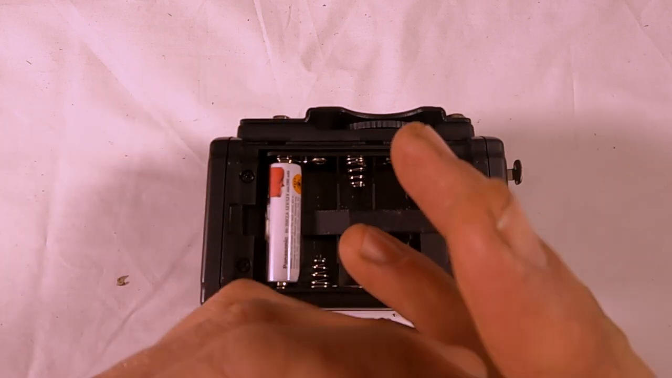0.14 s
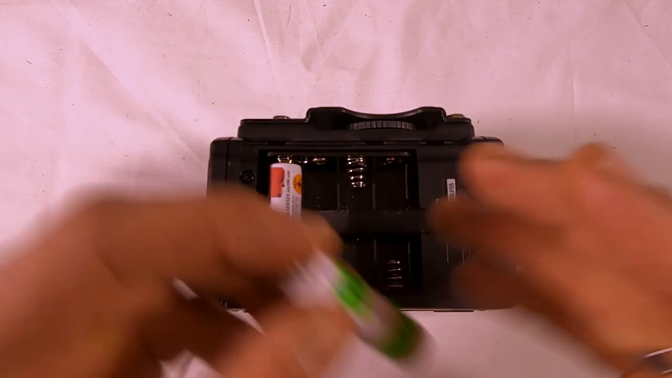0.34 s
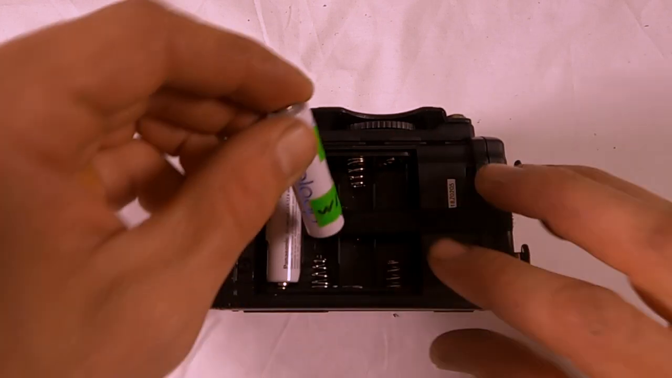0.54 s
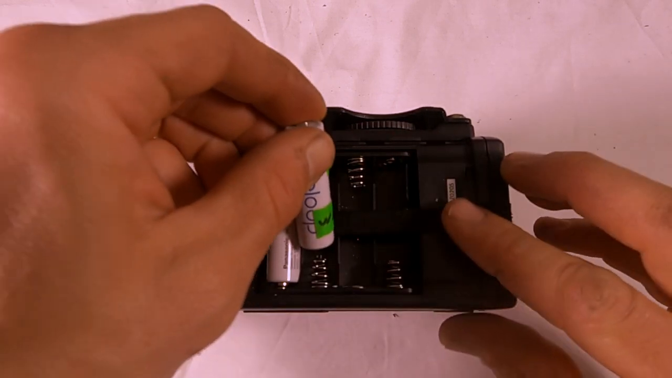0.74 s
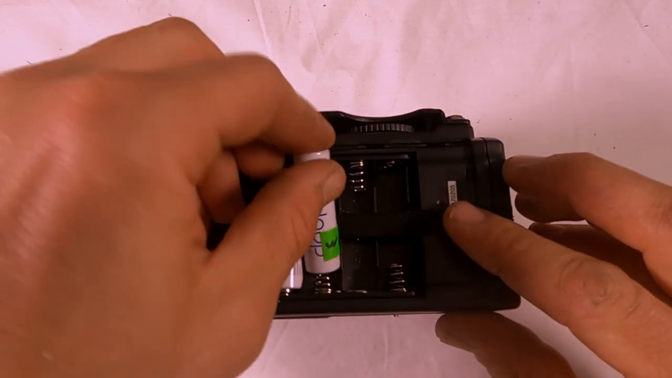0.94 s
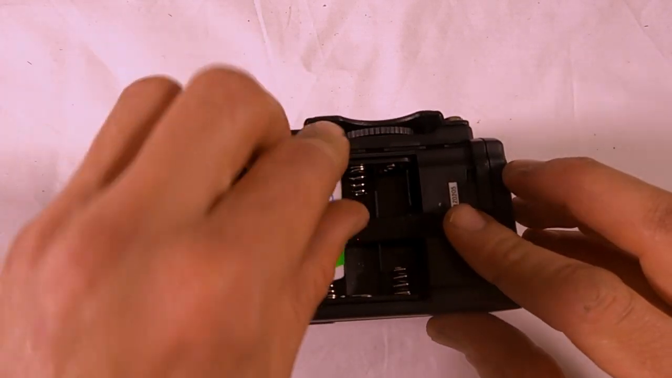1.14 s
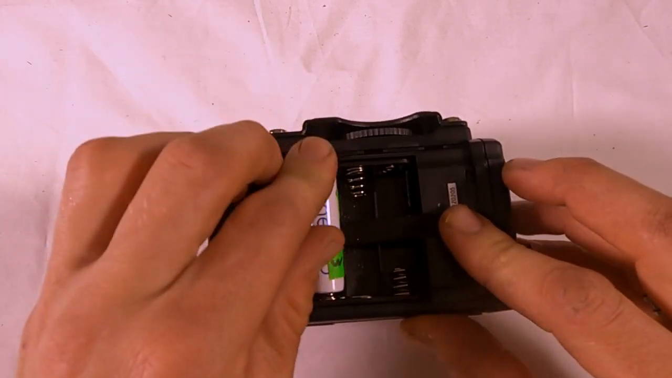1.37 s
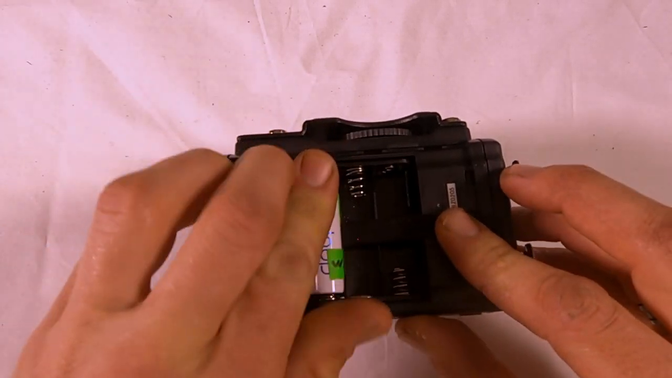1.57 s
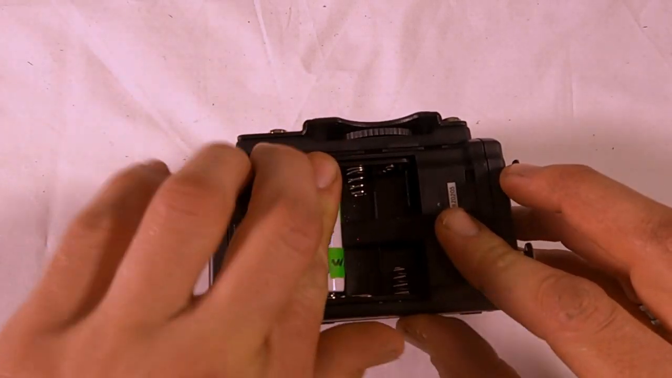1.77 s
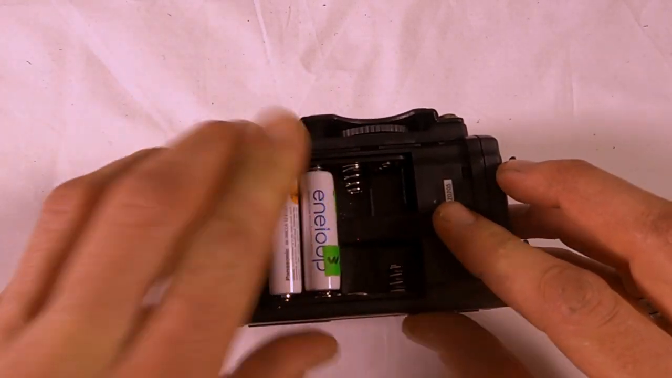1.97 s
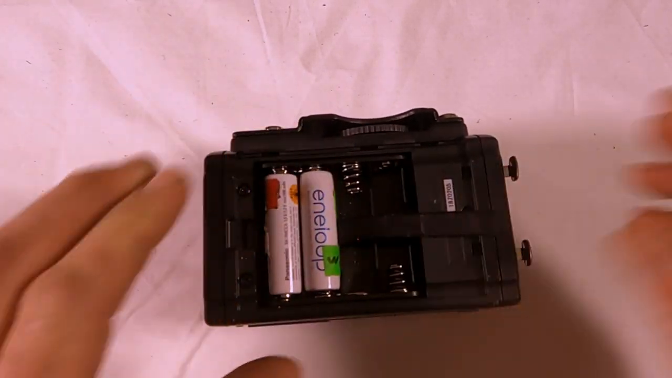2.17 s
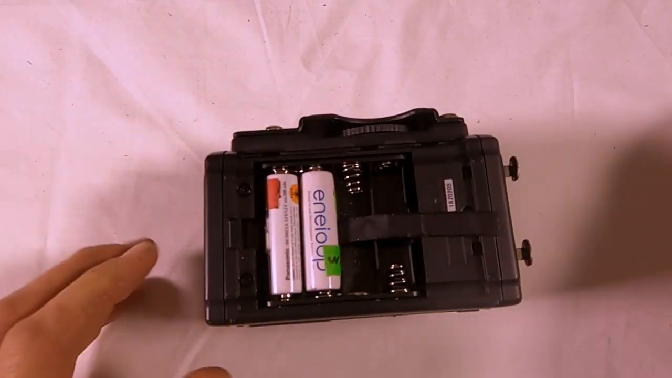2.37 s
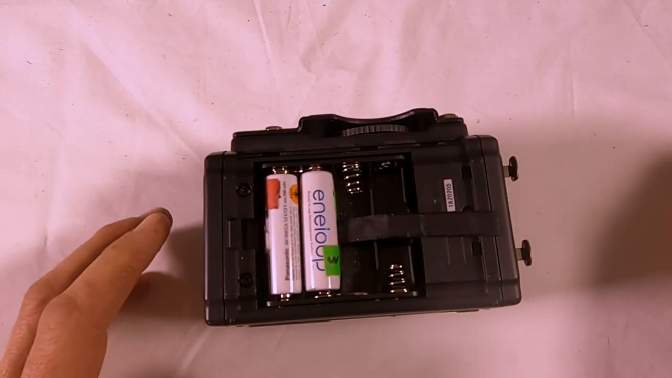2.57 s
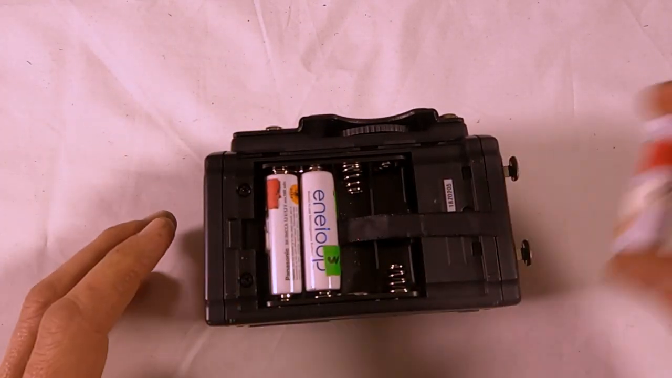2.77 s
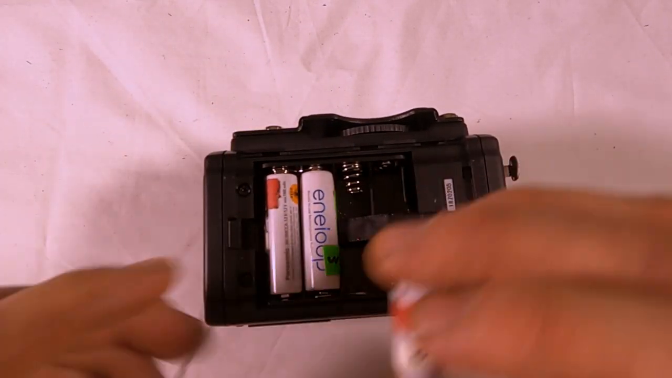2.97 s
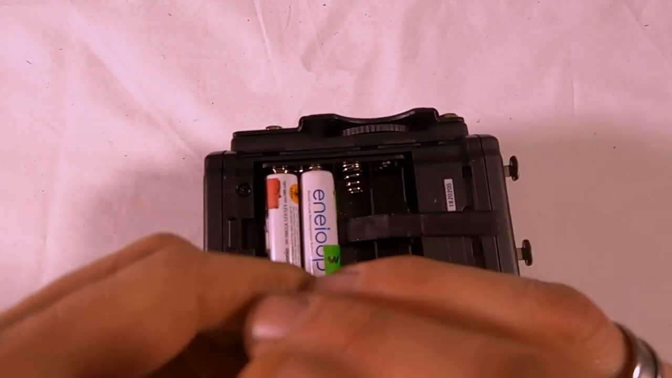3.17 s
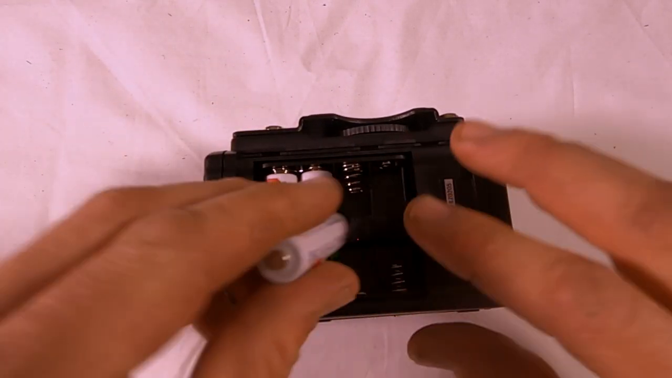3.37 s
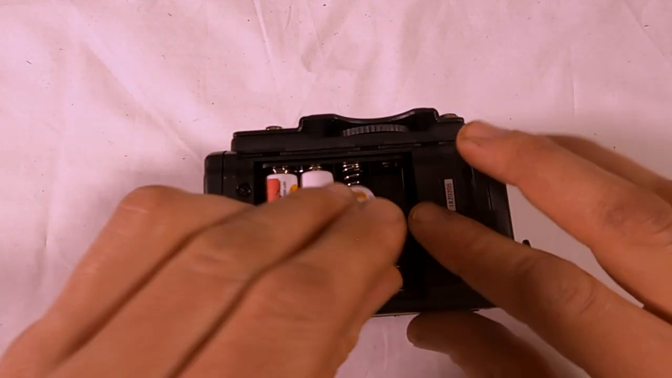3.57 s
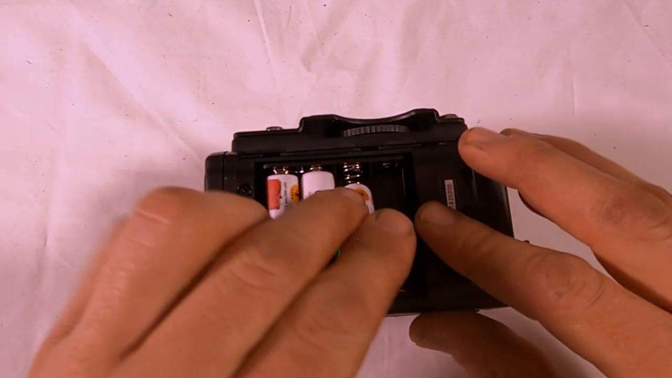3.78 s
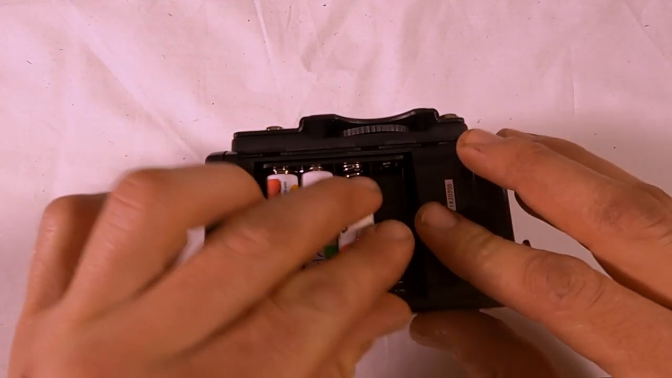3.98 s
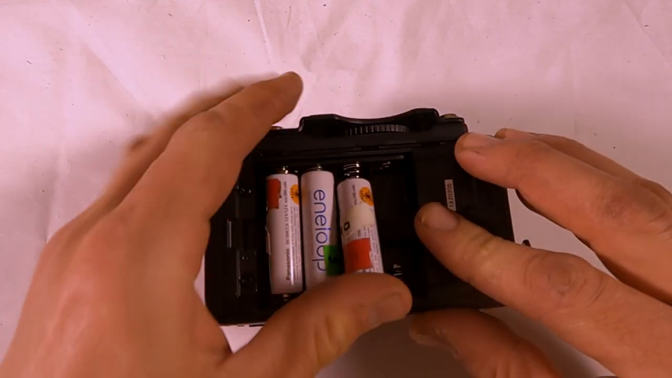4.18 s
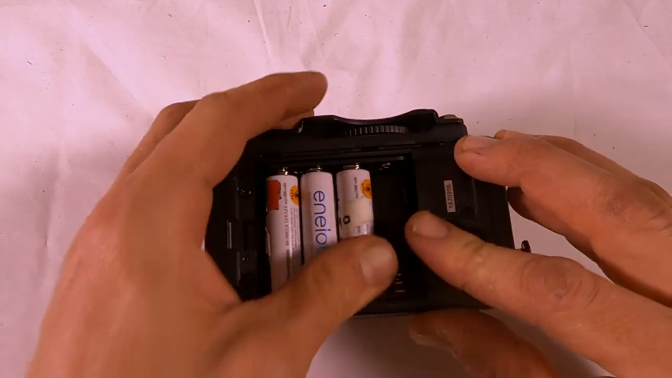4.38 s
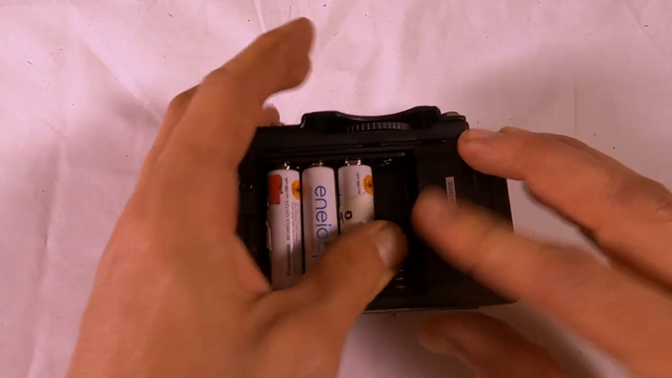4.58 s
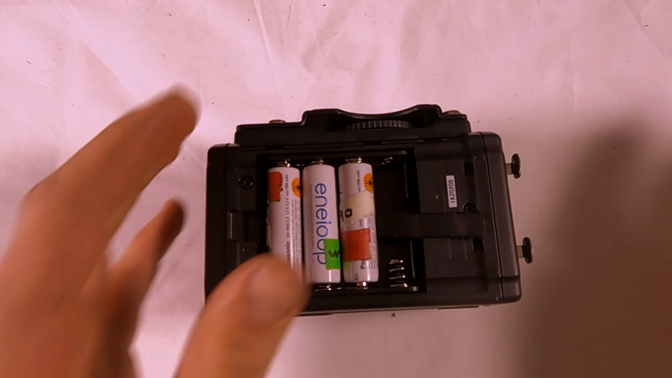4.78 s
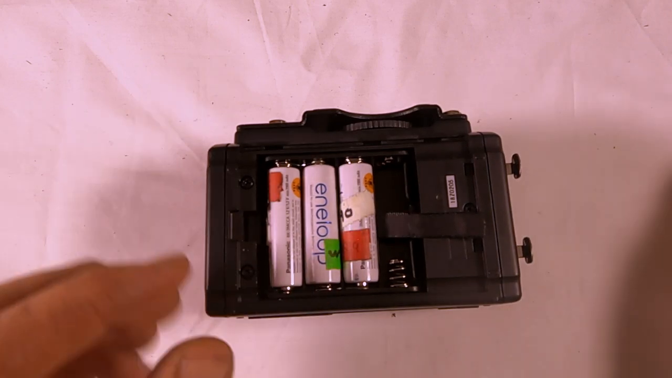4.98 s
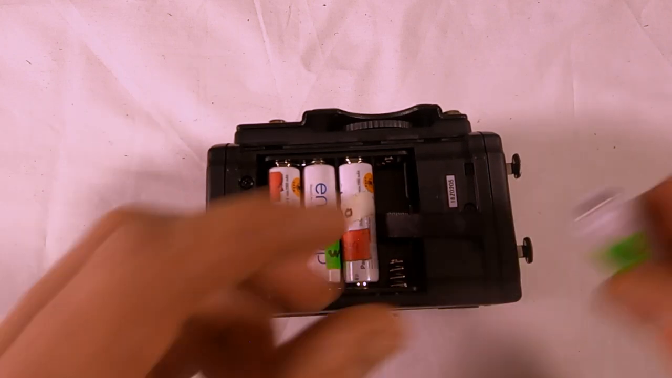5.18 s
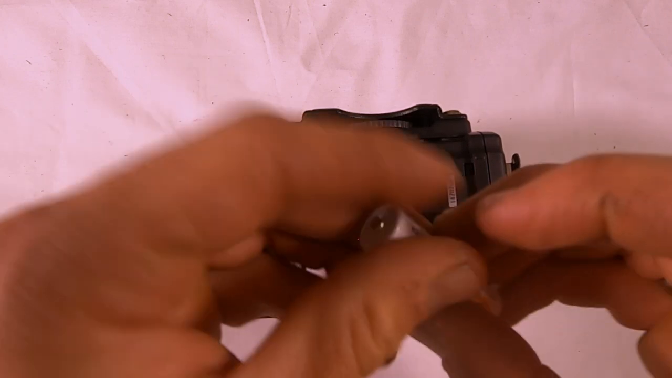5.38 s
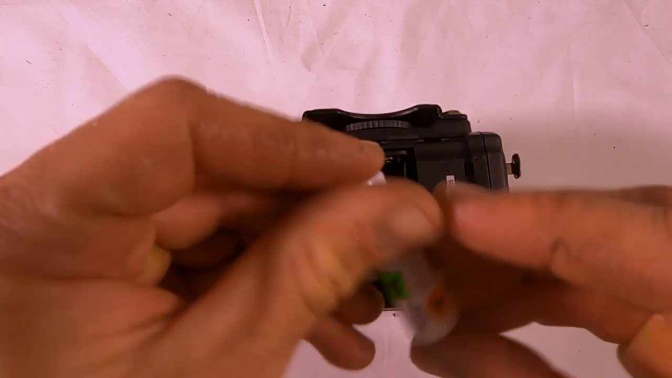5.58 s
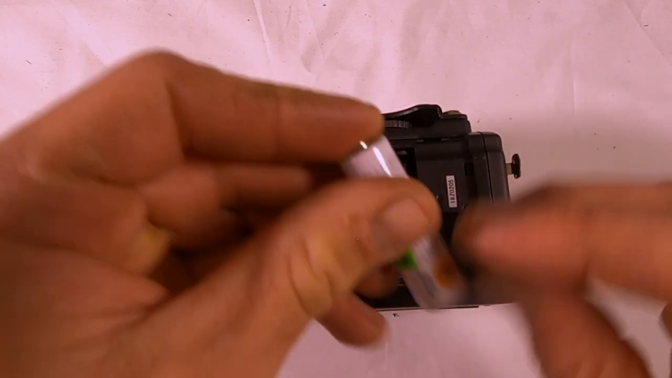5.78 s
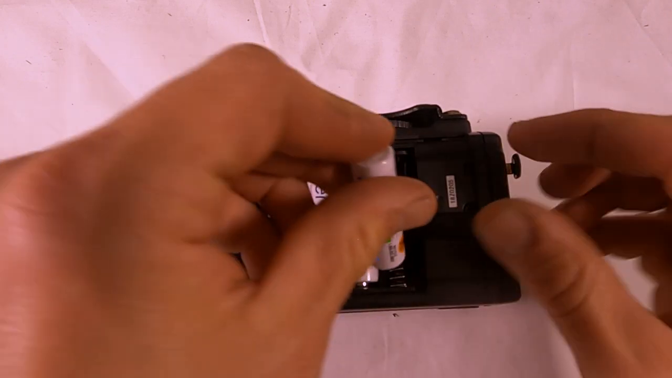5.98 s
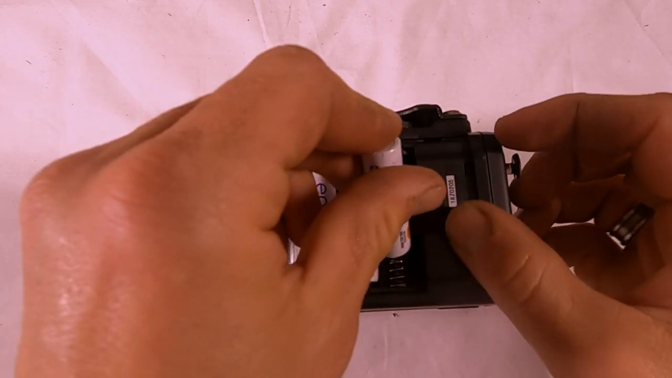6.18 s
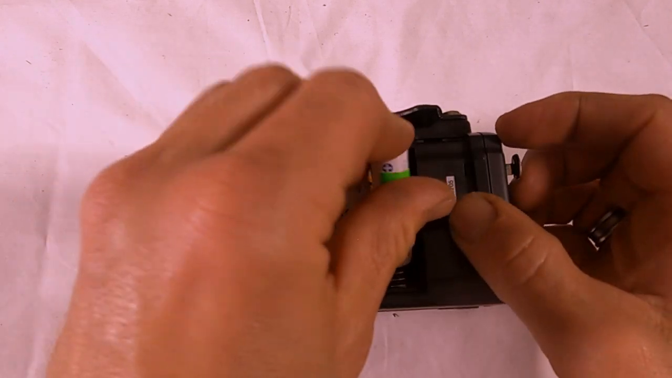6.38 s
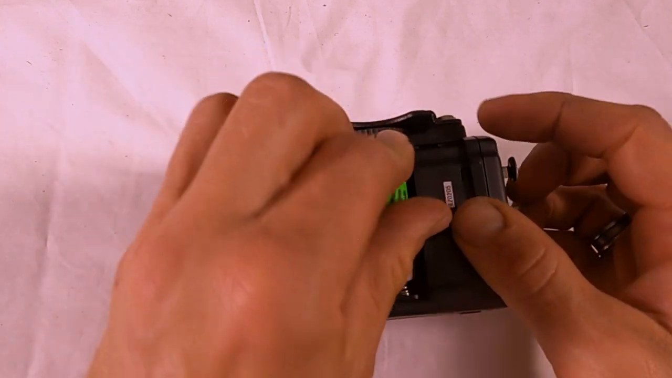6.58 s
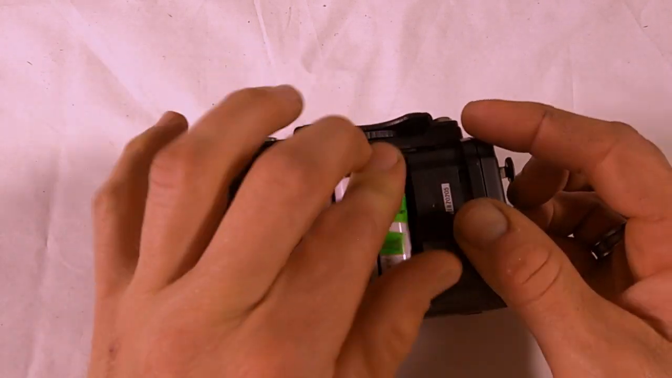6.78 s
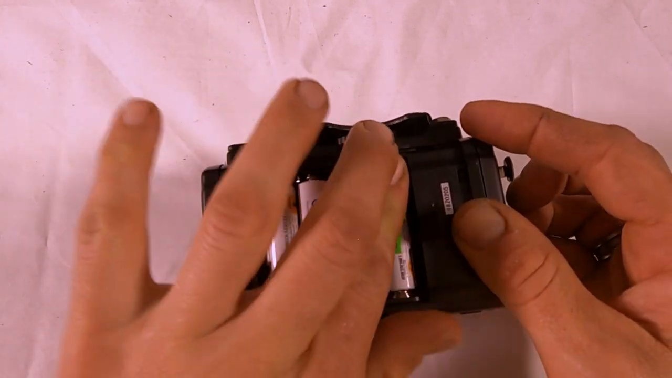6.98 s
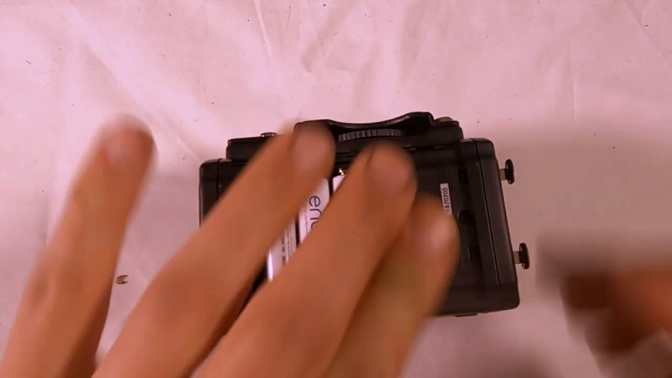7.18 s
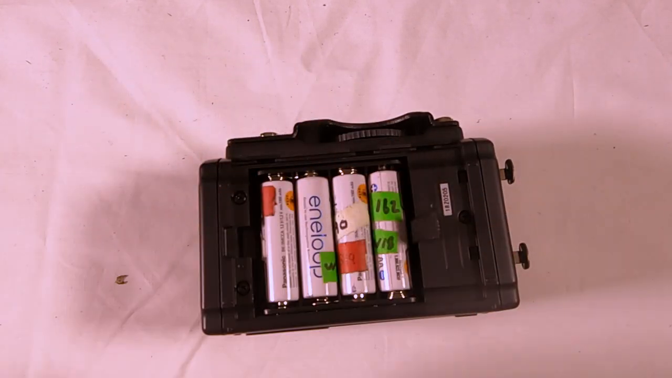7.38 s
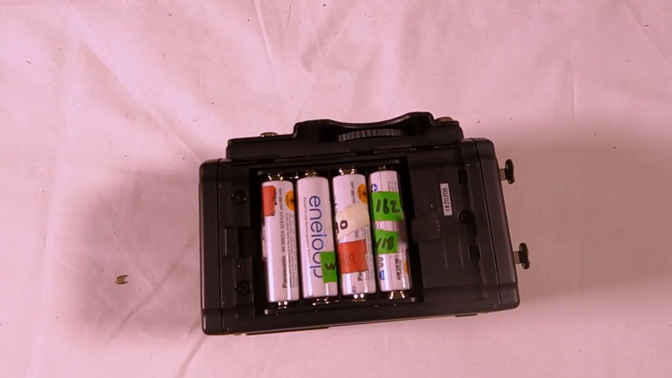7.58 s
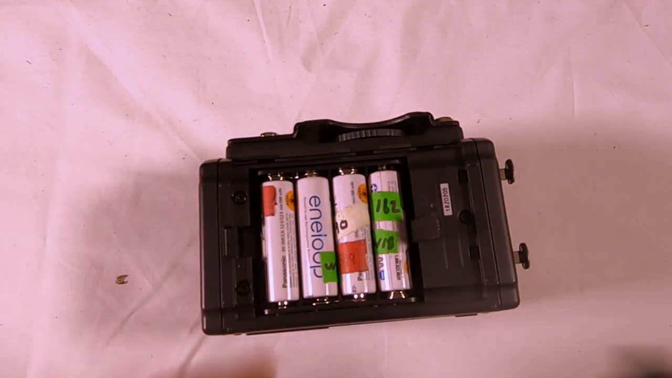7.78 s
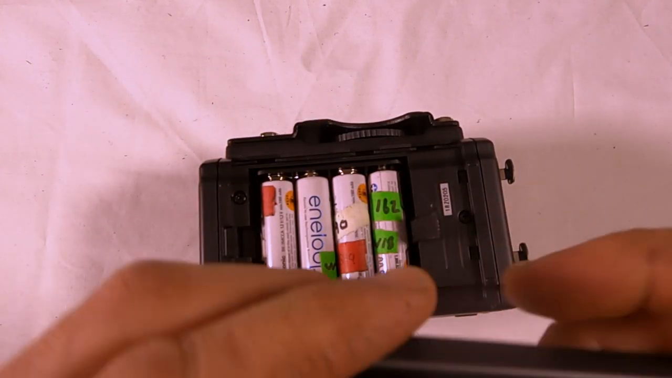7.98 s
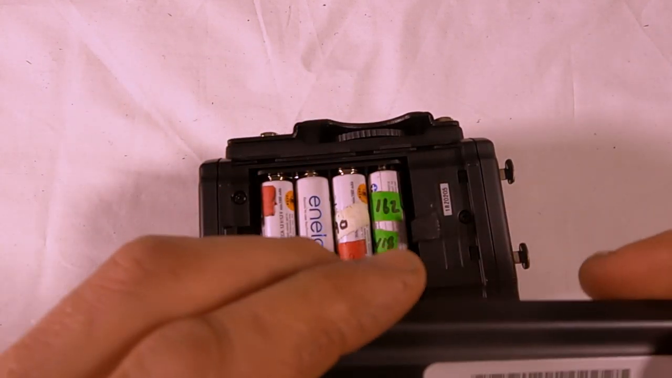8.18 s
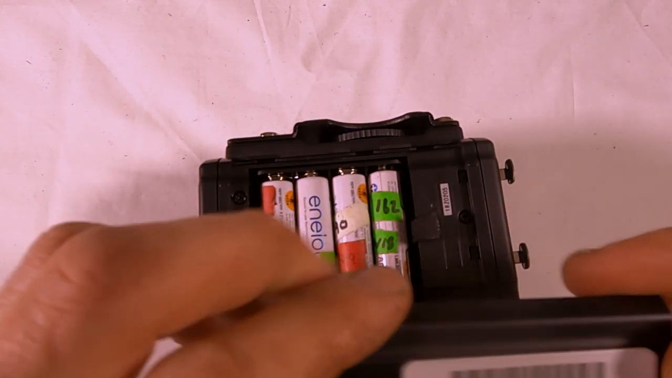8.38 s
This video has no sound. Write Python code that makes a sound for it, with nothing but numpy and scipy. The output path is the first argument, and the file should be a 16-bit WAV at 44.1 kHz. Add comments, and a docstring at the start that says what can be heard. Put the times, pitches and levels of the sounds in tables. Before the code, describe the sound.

Batteries are pushed one after another into the plastic compartment of a small device on a cloth-covered table. They come in three clusters of knocks, scuffs and sharp clicks, with faint twangs from the spring terminals and dull thumps as the case rocks. Fingers rub and squeak softly in between, and a plastic lid clacks lightly near the end. The microphone is close, in a small room with steady hum and ventilation rumble.

```python
"""A small room with mains hum and ventilation rumble; close mono microphone at a cloth-covered table. Batteries
are pressed one by one into the plastic bay of a portable recorder; then its lid slides over the cloth and is
picked up. Cells knock and scuff the case, ringing its modes, and snap onto spring terminals whose coils ring
on. The case thumps on the table; hands rub and squeak by stick-slip."""
import sys
import numpy as np
from scipy import signal
from scipy.fft import rfft, irfft, next_fast_len
from scipy.io import wavfile
from scipy.ndimage import uniform_filter1d

SR = 44100
rng = np.random.default_rng(int(sys.argv[2]) if len(sys.argv) > 2 else 0)


def unload_audio(sound):
    """Save the sound as a 16-bit wav file, at the path given as the first command line argument."""
    columns = np.transpose(np.atleast_2d(sound))
    # keep every value between -1 and 1, then stretch to whole-number steps
    steps = np.round(np.clip(columns, -1, 1) * 32767)
    wavfile.write(sys.argv[1], SR, steps.astype(np.int16))


N = 372115
TAP = 4096  # samples in one ring of the case
TIME_S = np.arange(N) / SR
RING_S, TAP_S = TIME_S[:SR // 4], TIME_S[:TAP]
TAP_HZ = np.linspace(1, SR / 2, TAP // 2 + 1)


def undb(db):
    """Decibels to gain."""
    return 10 ** (np.asarray(db) / 20)


def unit(x):
    """Scale to rms 1."""
    return x / np.sqrt(np.mean(x ** 2))


def fade(t, t60_s):
    """Exponential decay."""
    return np.exp(-np.log(1000) * t / max(t60_s, .001))


def band(x, low_hz, high_hz, order=2):
    """Causal band-pass."""
    sos = signal.butter(order, [low_hz, min(high_hz, SR * .48)], "band", fs=SR, output="sos")
    return signal.sosfilt(sos, x)


def colour(x, points):
    """Shape by (freq_hz, gain_db) points, to rms 1."""
    hz, db = np.transpose(points)
    size = next_fast_len(len(x), True)
    bins_hz = np.linspace(1, SR / 2, size // 2 + 1)
    gain = undb(np.interp(np.log(bins_hz), np.log(hz), db))
    return unit(irfft(rfft(x, size) * gain, size)[:len(x)])


def drift(rate_hz):
    """Smooth random drift, rms 1."""
    size = int(SR / rate_hz)
    steps = np.repeat(rng.standard_normal(N // size + 1), size)
    return unit(uniform_filter1d(steps, size)[:N])


def add(track, start_s, x):
    """Mix x into the track."""
    start = int(start_s * SR)
    track[start:start + len(x)] += x[:len(track) - start]


def background(air_db=-61, waver_db=1.0):
    """Wavering mains hum over ventilation rumble and hiss."""
    # freq_hz, gain_db
    air_spectrum = [(20, -13), (50, -10.5), (85, -4.5), (125, -7), (165, -7.5), (245, -9), (290, -18.5),
                    (420, -19.5), (550, -25.5), (1000, -33.5), (1700, -37), (3000, -41.5), (7000, -44.5),
                    (16000, -47.5)]
    # freq_hz, rms_db
    hum_partials = [(120, -52.5), (240, -66.5)]
    air = colour(rng.standard_normal(N), air_spectrum)
    air *= undb(air_db) / np.std(band(air, 300, 16000, order=6))  # level set above the rumble
    hum = sum(undb(db) * unit(np.sin(2 * np.pi * (hz * TIME_S + rng.random())))
              for hz, db in hum_partials)
    return air + hum * undb(waver_db * drift(1.8))


def rubs(rub_db=-2, hiss_db=-1, ring_db=-4, grain_db=3.0, swell_db=17):
    """Skin, and near 7.5 s the lifted lid, slide over case and cloth in tiny catches; each stroke swells, sinks
    and rings a spot."""
    # peak_s, rise_s, fall_s, level_db, bright_db, ring_hz
    strokes = [(0.42, 0.2, 0.4, -61, -14, 680), (2.258, 0.16, 0.24, -65.5, -6, 1990),
               (2.462, 0.11, 0.15, -55, -15, 510), (4.938, 0.023, 0.11, -50.5, -12, 734),
               (5.25, 0.28, 0.38, -66.5, -14, 1710), (6.285, 0.056, 0.082, -58.5, -18, 1484),
               (7.08, 0.051, 0.15, -51, -16.5, 360), (7.455, 0.034, 0.03, -56, 0.5, 2170),
               (7.586, 0.062, 0.024, -52.5, 9, 1090), (7.81, 0.88, 0.28, -62.5, -4, 1650)]
    # freq_hz, gain_db
    rub_spectrum = [(250, 4), (700, 2), (1700, -5), (3000, -10.5), (5000, -24), (16000, -35)]
    # freq_hz, gain_db
    hiss_spectrum = [(800, -22), (1250, -4), (1800, -1), (2500, 8), (4300, -4.5), (5500, 4), (7000, -4.5),
                     (8600, 4.5), (12500, 5), (14700, -1), (16000, -9)]
    catches = rng.standard_normal((2, N)) * undb(grain_db * drift(350))
    rub, hiss = colour(catches[0], rub_spectrum), colour(catches[1], hiss_spectrum)
    out = np.zeros(N)
    for peak_s, rise_s, fall_s, level_db, bright_db, ring_hz in strokes:
        from_peak = np.maximum((peak_s - TIME_S) / rise_s, (TIME_S - peak_s) / fall_s)
        envelope = undb(level_db - swell_db * np.minimum(from_peak, 10))
        ring = unit(band(catches[1], ring_hz / 1.15, ring_hz * 1.15))
        out += envelope * (undb(rub_db) * rub + undb(ring_db) * ring + undb(bright_db + hiss_db) * hiss)
    return out


def squeaks(waver=0.032, overtone_db=-25):
    """Cell or skin sticks and slips on plastic: short, wavering tones."""
    # start_s, length_s, pitch_hz, rms_db
    slips = [(0.654, 0.052, 895, -61.5), (2.875, 0.081, 465, -53), (3.736, 0.032, 737, -54),
             (3.847, 0.078, 760, -44.5), (6.449, 0.021, 820, -52)]
    out = np.zeros(N)
    for start_s, length_s, pitch_hz, rms_db in slips:
        progress = np.linspace(0, 1, int(length_s * SR))
        phase = 2 * np.pi * np.cumsum(pitch_hz * (1 + waver * drift(230)[:len(progress)])) / SR
        tone = np.sin(phase) + undb(overtone_db) * np.sin(2 * phase)
        add(out, start_s, undb(rms_db) * unit(np.sin(np.pi * np.sqrt(progress)) * tone))
    return out


def table_thumps(rise_s=0.0041, trim_db=-2, rattle_gain=0.44, t60_cycles=13.1):
    """The case rocks on the cloth: a low swing of the table top with a dull rattle."""
    # start_s, level_db, pitch_hz
    thumps = [(1.314, -25.5, 47.7), (1.399, -30.5, 121), (1.476, -31, 81), (1.805, -35.5, 45.4),
              (2.334, -17, 102.6), (2.345, -22.5, 61), (2.399, -22, 142), (3.933, -17, 132),
              (4.202, -25.5, 74.6), (4.298, -19, 96), (4.327, -20.5, 121.6), (4.914, -16.5, 125),
              (4.947, -31.5, 126.6), (6.509, -23.5, 113.3), (6.759, -15, 85.3), (6.78, -17, 129),
              (7.393, -31.5, 117), (7.431, -23.5, 134)]
    out = np.zeros(N)
    for start_s, level_db, pitch_hz in thumps:
        swing = np.sin(2 * np.pi * pitch_hz * RING_S)
        rattle = rattle_gain * unit(band(rng.standard_normal(len(RING_S)), 6.7, 200))
        envelope = fade(RING_S, t60_cycles / pitch_hz) * (1 - np.exp(-RING_S / rise_s))
        add(out, start_s, undb(level_db + trim_db) * (swing + rattle) * envelope)
    return out


def lid(start_s=7.848):
    """The lifted plastic lid clacks in a few hollow modes."""
    # freq_hz, peak_db, t60_s
    lid_modes = [(949, -25, 0.038), (1296, -32.5, 0.047), (2470, -28.5, 0.036)]
    out = np.zeros(N)
    for freq_hz, peak_db, t60_s in lid_modes:
        add(out, start_s, undb(peak_db) * np.sin(2 * np.pi * freq_hz * RING_S) * fade(RING_S, t60_s))
    return out


def coils(twin_ratio=0.93, twin_db=-8):
    """A jolted coil spring rings with a close pair of metallic tones."""
    # start_s, level_db, pitch_hz, t60_s
    twangs = [(0.894, -50, 2690, 0.05), (1.002, -47, 2645, 0.081), (1.322, -46, 2650, .12),
              (1.396, -52, 2640, .08), (1.473, -63, 2690, .09), (1.8045, -32, 4780, 0.022),
              (3.934, -48.5, 1790, 0.47), (4.203, -48, 2560, 0.12), (4.202, -47.5, 4870, 0.023),
              (6.765, -49.5, 1596, 0.28), (6.775, -55, 14150, .13)]
    out = np.zeros(N)
    for start_s, level_db, pitch_hz, t60_s in twangs:
        phase = 2 * np.pi * pitch_hz * RING_S
        pair = np.sin(phase) + undb(twin_db) * np.sin(twin_ratio * phase)
        add(out, start_s, undb(level_db) * pair * fade(RING_S, t60_s))
    return out


def burst(contact_s):
    """Micro-impacts that swell and die, with a nearly flat spectrum."""
    age = TAP_S / (contact_s / 4)
    impacts = rng.standard_normal(TAP) * age * np.exp(-age)
    whitened = irfft(np.exp(1j * np.angle(rfft(impacts))))
    return whitened * (1 - np.exp(-2 * age)) * np.exp(-age / 2)


def resonance(freq_hz, width_hz, peak_db):
    """Power response of one mode."""
    return undb(2 * peak_db) / (1 + (2 * (TAP_HZ - freq_hz) / width_hz) ** 2)


def tilted(level_db, slope_db_oct):
    """Levels of the five registers; a harder contact has a flatter slope."""
    # octaves above 830 Hz: knock, hollow, clack, edge, tick
    register_oct = (0, -1.1, 1, 2.1, 3.5)
    return level_db + slope_db_oct * np.array(register_oct)


def case_ring(push, levels_db, spot_power=0, scatter_db=4.5, detune=0.01, bass_db=-12, top_db=-11.5):
    """A push rings the plastic shell and bay; mode weights vary with each contact."""
    # freq_hz, width_hz, gain_db over the dead plastic
    case_modes = [(213.8, 15, 9.5), (348.4, 8.8, 13.5), (399, 55, 10.5), (735, 21, 18.5), (851, 45, 17),
                  (1025, 97, 11.5), (1362, 63, 9.5), (1593, 170, 8), (1766, 44, 8.5), (2420, 65, 7.5),
                  (2721, 200, 12), (3190, 100, 10), (5033, 320, -2.5), (5730, 170, -3), (6706, 320, 3),
                  (8670, 330, 6.5), (9800, 170, 4), (11840, 640, -2)]
    # low_hz, high_hz; rows: knock, hollow, clack, edge, tick
    registers = [(600, 1150), (250, 600), (1150, 2400), (2400, 5500), (5500, 16000)]
    jitter = rng.standard_normal((len(case_modes), 2))
    power = 1 + spot_power + sum(resonance(hz * (1 + detune * shift), width_hz, db + scatter_db * weight)
                                 for (hz, width_hz, db), (shift, weight) in zip(case_modes, jitter))
    band_power = [power[(TAP_HZ > low) & (TAP_HZ < high)].sum() / len(power) for low, high in registers]
    knock, hollow, clack, edge, tick = levels_db - 10 * np.log10(band_power)
    shape_db = np.interp(np.log(TAP_HZ), np.log([60, 200, 580, 820, 1600, 3600, 9000, 16000]),
                         [hollow + bass_db, hollow, hollow, knock, clack, edge, tick, tick + top_db])
    # minimum phase: registers start together, narrow modes ring on
    cepstrum = irfft(np.log(np.sqrt(power) * undb(shape_db)))
    cepstrum[1:TAP // 2] *= 2
    cepstrum[TAP // 2 + 1:] = 0
    response = irfft(np.exp(rfft(cepstrum)))
    return signal.fftconvolve(response, push / np.linalg.norm(push))


def scuffs(length_s=0.013, grit_db=4, ping_q=12, ping_db=12):
    """Cell or fingertip scuffs the plastic: a swell of tiny catches rings the case."""
    # start_s, level_db, slope_db_oct, ping_hz
    contacts = [(0.892, -26, -4, 1320), (0.974, -25.5, -5, 1750), (1.467, -24.5, -3.5, 790),
                (1.533, -30.5, -3, 1420), (1.74, -27.5, -3, 3660), (3.851, -28.5, -1.5, 3780),
                (4.071, -34, -1.5, 1090), (4.292, -21, -3, 2480), (4.362, -24.5, -3, 2600),
                (4.618, -32.5, -2, 1100), (4.914, -31, -5, 734), (6.125, -34.5, -6.5, 826),
                (6.657, -33, -3, 1710), (6.686, -39, 1.5, 11900), (7.066, -29.5, -11.5, 383),
                (7.12, -29.5, -3.5, 1690), (7.568, -29, 0.5, 5450), (7.592, -27, -0.5, 5340),
                (7.64, -34, 0.5, 2450)]
    # knock_db, hollow_db, clack_db, edge_db, tick_db
    colour_db = (1.5, -2, -1, -2.7, 0)
    out = np.zeros(N)
    age = TAP_S / (length_s / 4)
    for start_s, level_db, slope_db_oct, ping_hz in contacts:
        catches = rng.standard_normal(TAP) * undb(grit_db * rng.standard_normal(TAP))
        levels_db = tilted(level_db, slope_db_oct) + colour_db
        ping = resonance(ping_hz, ping_hz / ping_q, ping_db)
        add(out, start_s, case_ring(catches * age * np.exp(-age), levels_db, ping))
    return out


def snaps(contact_s=0.0047, ping_q=14, crack_power=3.162):
    """A terminal or hard edge slips free: a bright ping and a dry crack over the case's ring."""
    # start_s, level_db, edge_db, ping_hz, ping_db
    clicks = [(0.882, -23.5, -21, 13800, 22), (1.314, -1, -10.5, 11400, 15), (1.8033, -5, -11.5, 14100, 12),
              (2.449, -29, -2, 2400, 21), (4.3, -27.5, -3, 5000, 15), (4.3464, -15.5, -10.5, 5750, 18),
              (4.361, -35, -10, 14000, 14), (4.389, -33.5, 6, 5600, 9), (4.514, -31.5, -14, 9400, 19),
              (6.488, -32, -3.5, 3946, 16), (6.5057, -17, -11, 8860, 19), (6.7739, -13.5, -8, 9300, 16),
              (7.601, -24.5, -7, 12600, 21)]
    # knock_db, hollow_db, clack_db
    colour_db = (-18.5, -15, -26)
    out = np.zeros(N)
    for start_s, level_db, edge_db, ping_hz, ping_db in clicks:
        levels_db = np.add([*colour_db, edge_db, 0], level_db)
        ping = resonance(ping_hz, ping_hz / ping_q, ping_db)
        add(out, start_s, case_ring(burst(contact_s), levels_db, crack_power + ping))
    return out


def knocks(ping_q=11):
    """Cell or lid hits plastic: the whole case rings and the struck spot pings."""
    # start_s, level_db, slope_db_oct, hollow_db, ping_hz, ping_db, contact_s
    hits = [(0.9995, -2.5, -9.5, -10, 790, 19, 0.0099), (1.321, -2, -9.5, -4.5, 695, 22, 0.0093),
            (1.396, -14.5, -5.5, -4, 2700, 14, 0.0046), (1.804, -15, -1.5, -3, 1040, 20, 0.0031),
            (2.341, -24.5, -8.5, 7.5, 200, 24, 0.0031), (2.3735, -20, -12, 3, 1290, 21, 0.008),
            (3.932, 14.5, -5.5, -22.5, 2230, 15, 0.0044), (3.9432, -4.5, -13, -14.5, 1400, 13, .004),
            (4.1999, 1, -8.5, -3.5, 800, 17, 0.011), (4.3468, -6, -7.5, -3, 734, 19, 0.005),
            (6.466, -3, -9, -6, 727, 23, 0.0062), (6.508, -5.5, -17.5, -5, 725, 17.5, 0.0046),
            (6.635, -26, -1.5, -18, 3110, 28, 0.0095), (6.761, 3.5, -6.5, -8.5, 1620, 23, 0.012),
            (6.766, 2.5, -15, -2.5, 710, 11, 0.0051), (6.773, -6, -3, 6, 351, 18.5, 0.012),
            (7.8479, -9, -0.46, -16, 4150, 10, 0.0038)]
    # knock_db, hollow_db, clack_db, edge_db, tick_db
    colour_db = (-2.5, -1.5, -1, -3.5, 1)
    out = np.zeros(N)
    for start_s, level_db, slope_db_oct, hollow_db, ping_hz, ping_db, contact_s in hits:
        knock_db, _, *treble_db = tilted(level_db, slope_db_oct)
        levels_db = np.add([knock_db, knock_db + hollow_db, *treble_db], colour_db)
        ping = resonance(ping_hz, ping_hz / ping_q, ping_db)
        add(out, start_s, case_ring(burst(contact_s), levels_db, ping))
    return out


def room(x, gap_s=0.0055, slap_s=0.01, slap_db=-13, early_t60_s=0.12, late_db=-8):
    """Dense early reflections, a slap from a near wall and a short, soft tail."""
    # freq_hz, level_db, t60_s
    reverb_bands = [(153, -6, 0.99), (350, -9.5, 0.72), (720, -14.5, 0.44), (1277, -9.5, 0.44),
                    (3260, -8.5, 0.16), (6500, -13, 0.21), (15530, -16.5, 0.19)]
    t = TIME_S[:SR // 3]
    response = np.zeros(len(t))
    for freq_hz, level_db, t60_s in reverb_bands:
        decay = fade(t, early_t60_s) + undb(late_db) * fade(t, t60_s)
        tail = band(rng.standard_normal(len(t)), freq_hz / 1.23, freq_hz * 1.79) * decay
        bandwidth_gain = np.sqrt(freq_hz * (1.5 - 1 / 1.5) * 2 / SR)
        add(response, gap_s, undb(level_db) * bandwidth_gain * tail / np.linalg.norm(tail))
    add(response, slap_s, undb(slap_db) * band(signal.unit_impulse(len(t)), 260, 2800, order=1))
    return x + signal.oaconvolve(x, response)[:N]


def scene():
    """Handling sounds in the room, over the background."""
    handling = knocks() + snaps() + coils() + lid() + scuffs() + table_thumps() + squeaks() + rubs()
    return (room(handling) + background())[None]


def record(dry, top_hz=16200):
    """Steep low-pass."""
    return signal.sosfilt(signal.ellip(10, .2, 80, top_hz, fs=SR, output="sos"), dry)


dry = scene()
out = record(dry)
unload_audio(out)
```